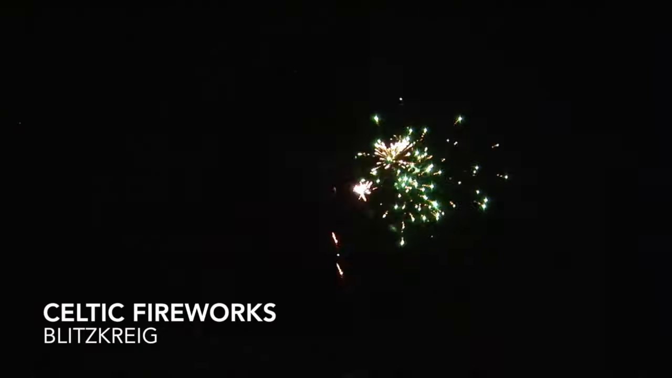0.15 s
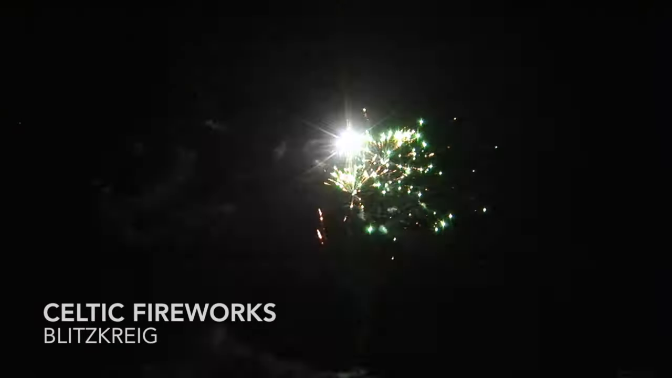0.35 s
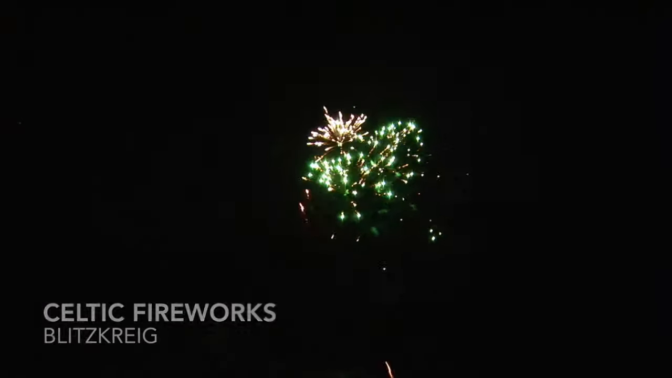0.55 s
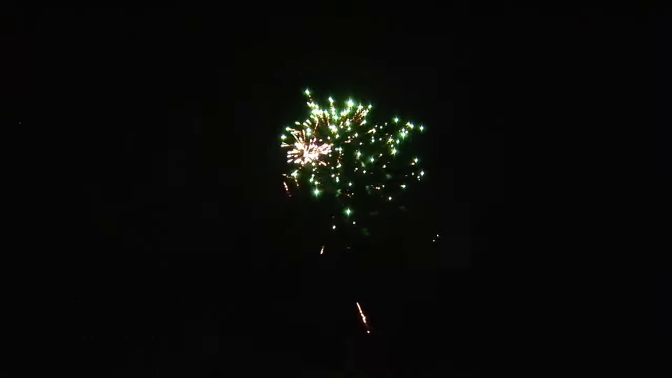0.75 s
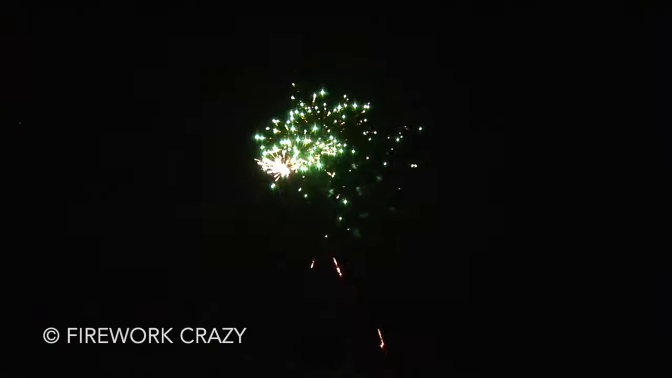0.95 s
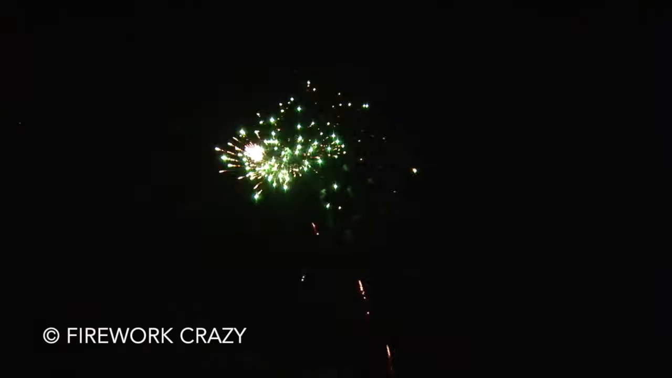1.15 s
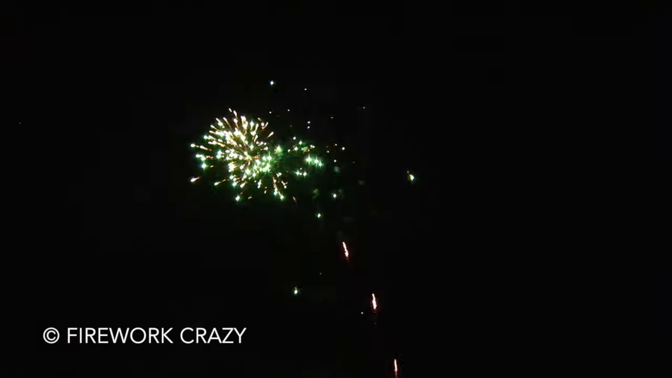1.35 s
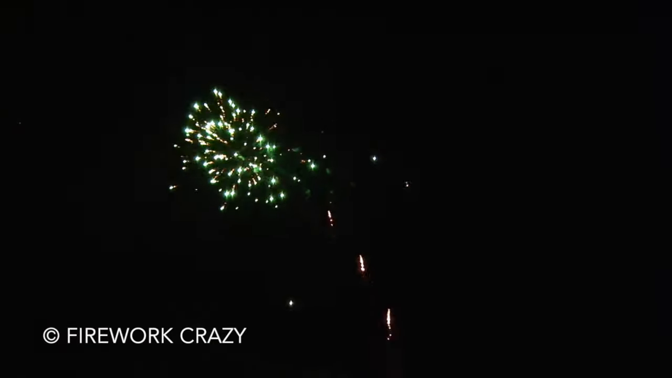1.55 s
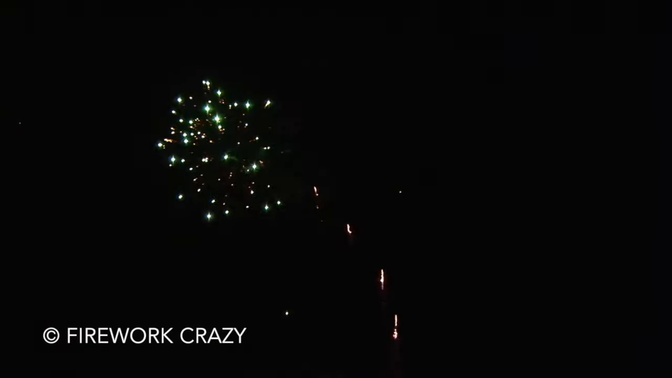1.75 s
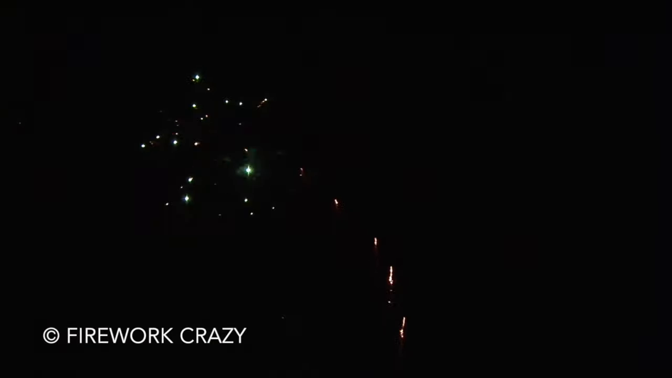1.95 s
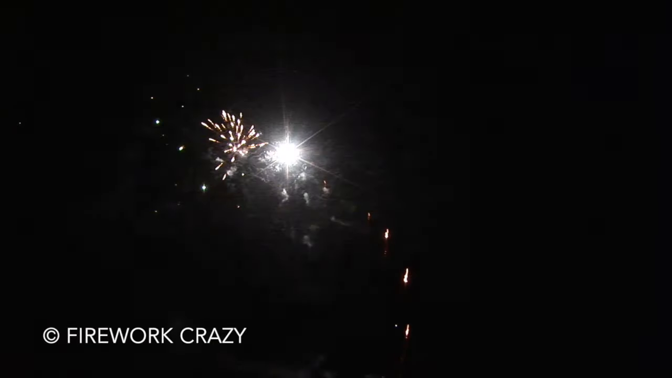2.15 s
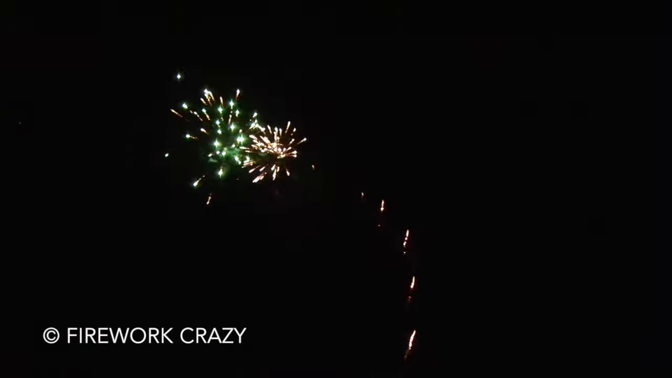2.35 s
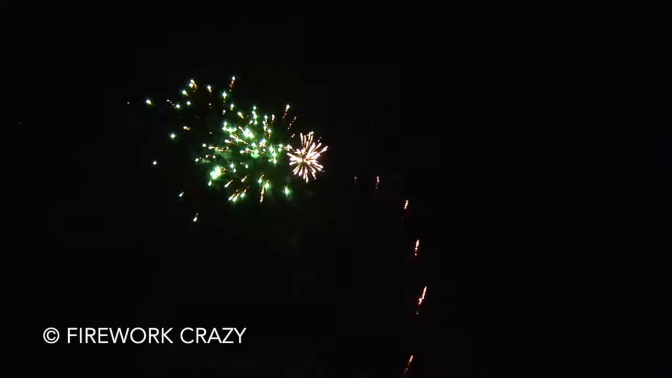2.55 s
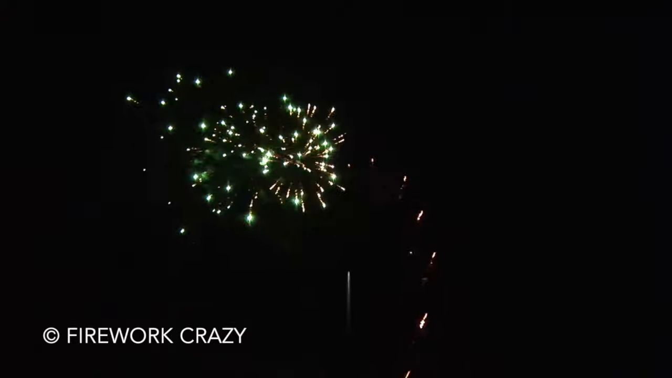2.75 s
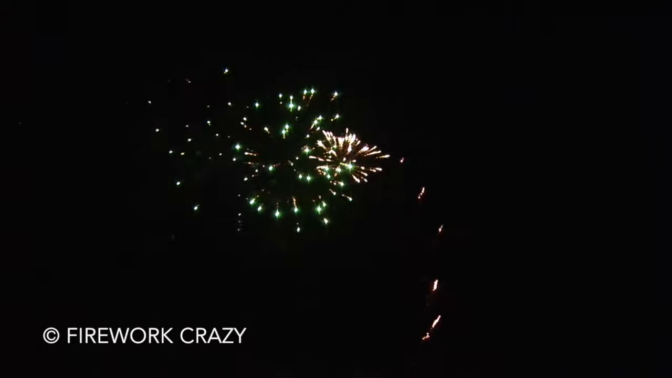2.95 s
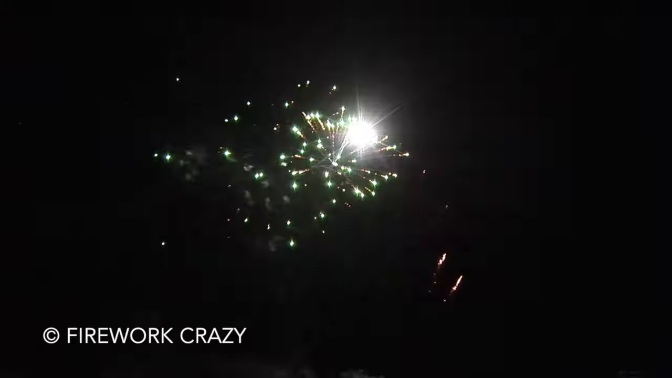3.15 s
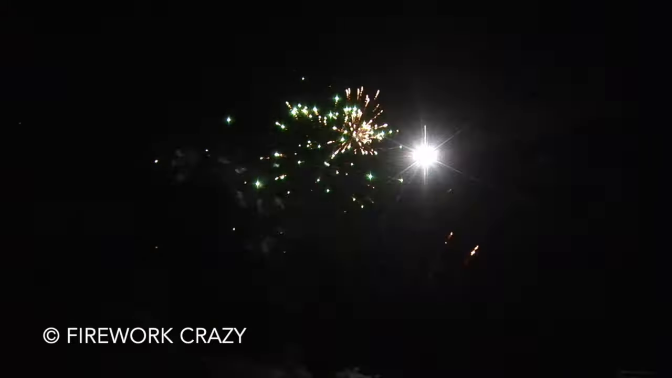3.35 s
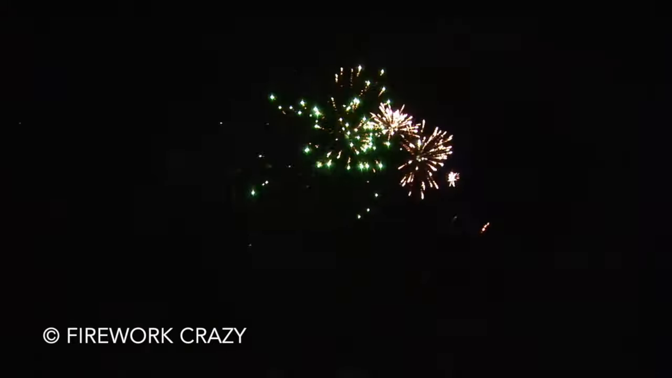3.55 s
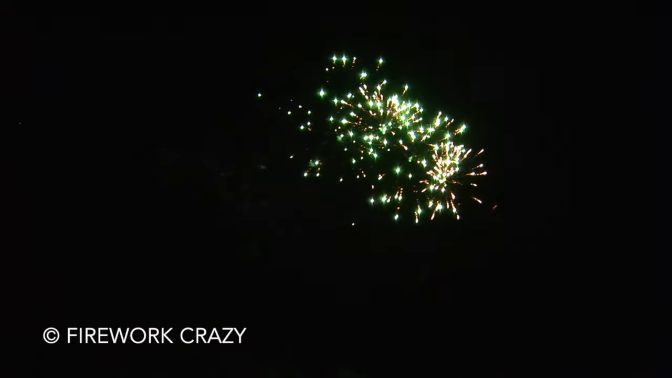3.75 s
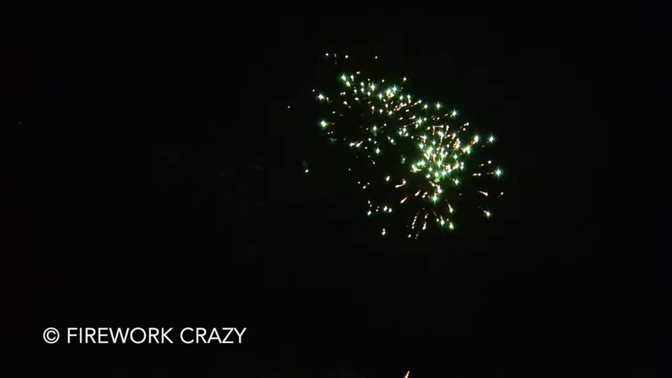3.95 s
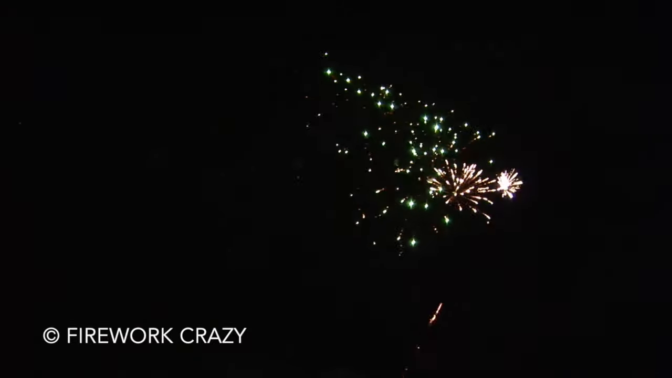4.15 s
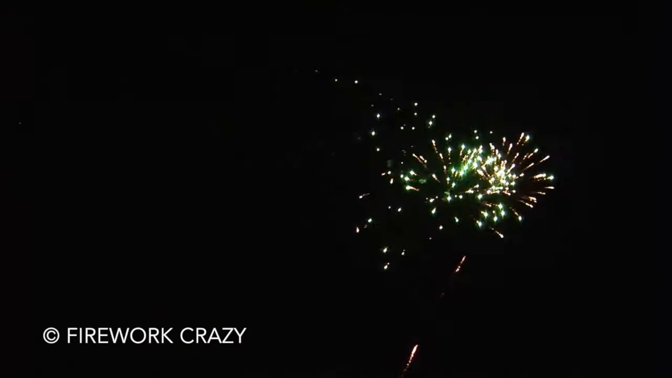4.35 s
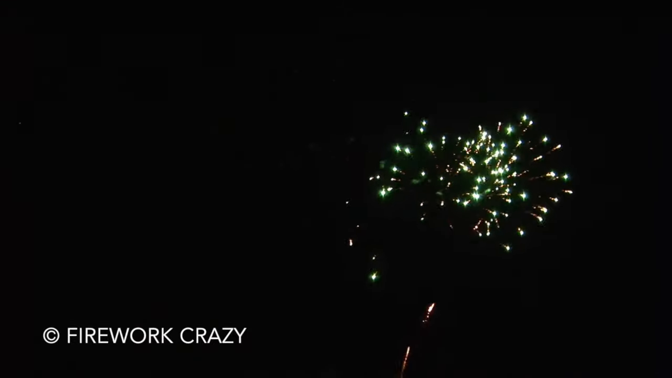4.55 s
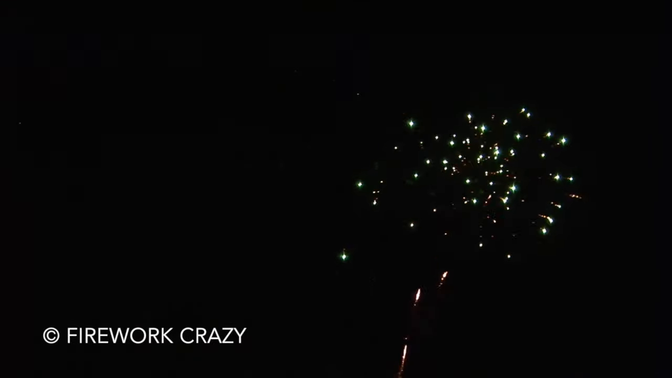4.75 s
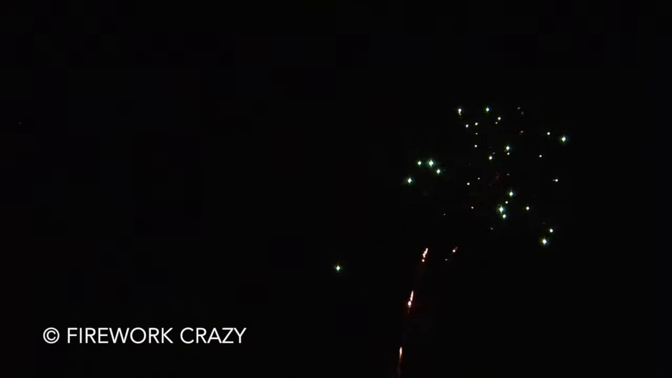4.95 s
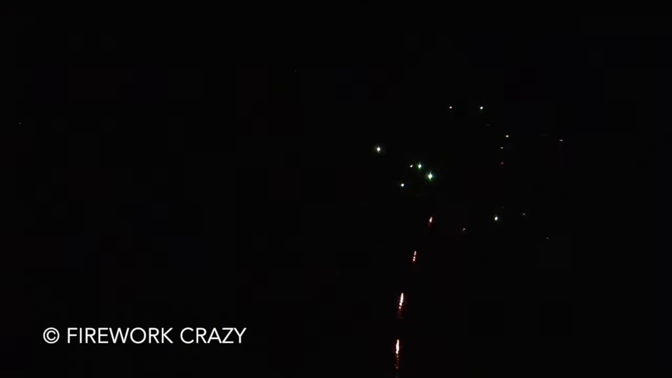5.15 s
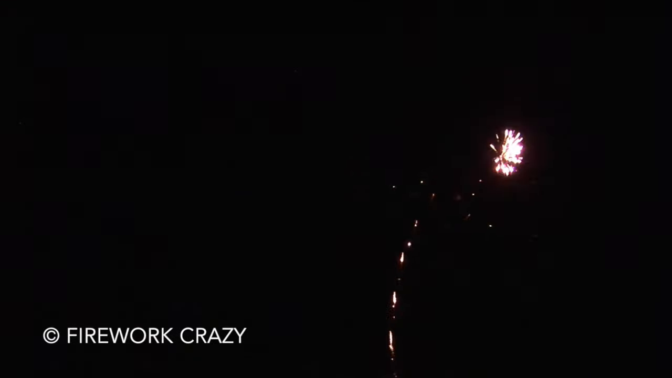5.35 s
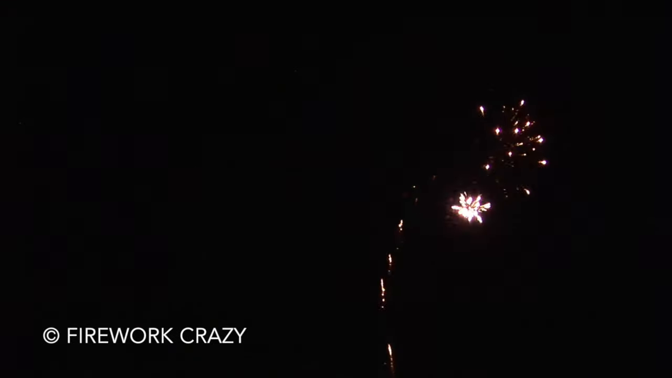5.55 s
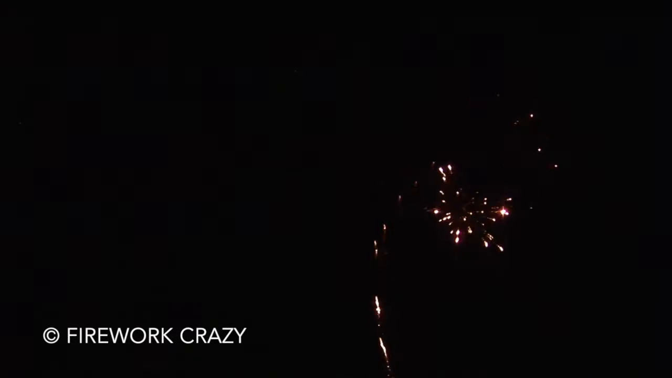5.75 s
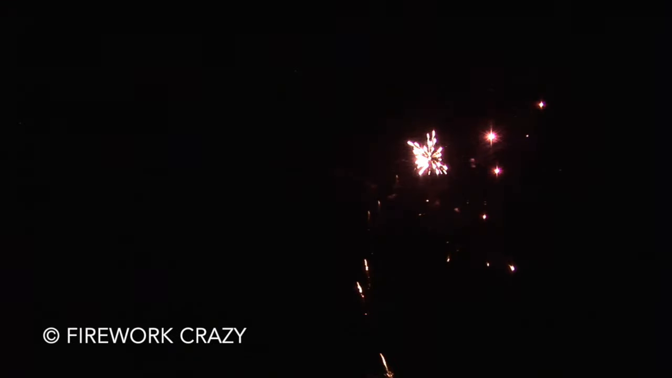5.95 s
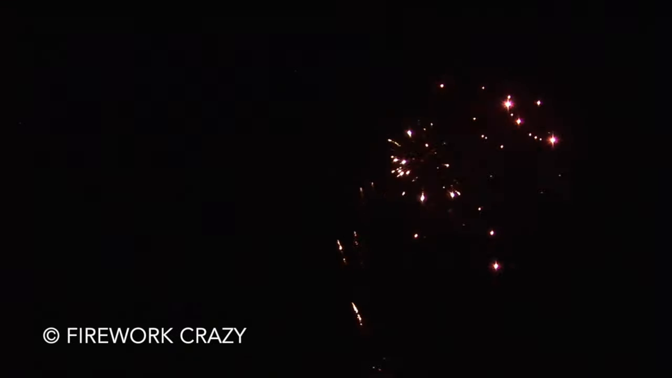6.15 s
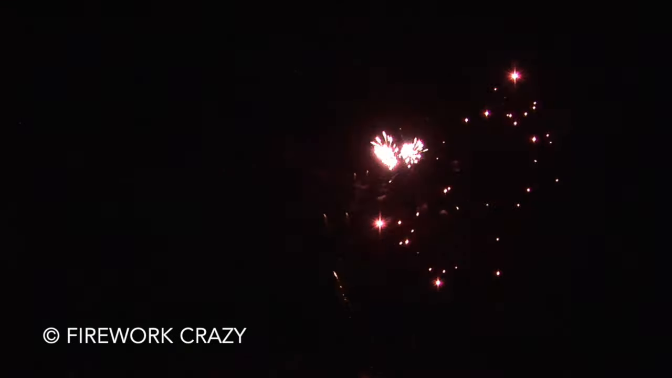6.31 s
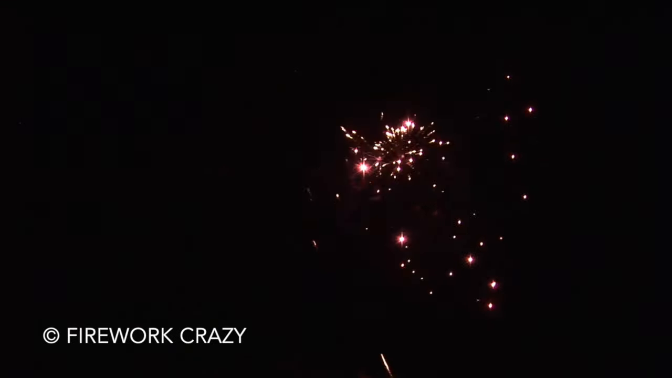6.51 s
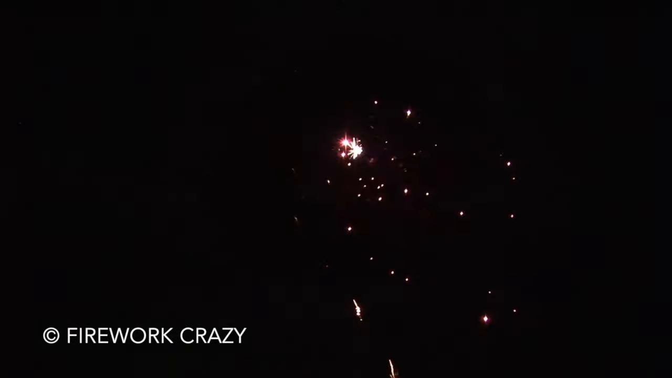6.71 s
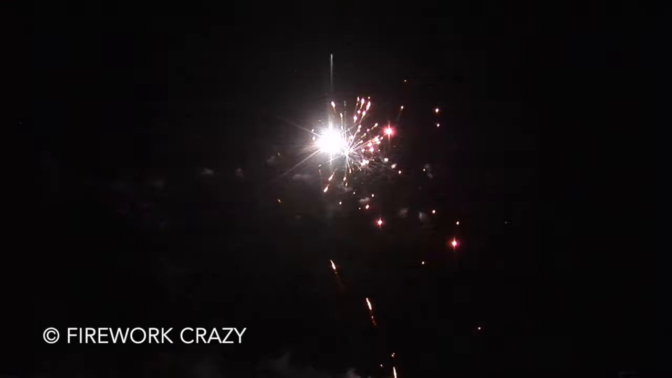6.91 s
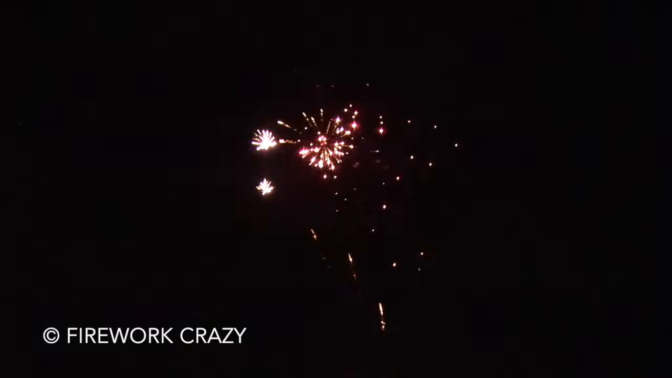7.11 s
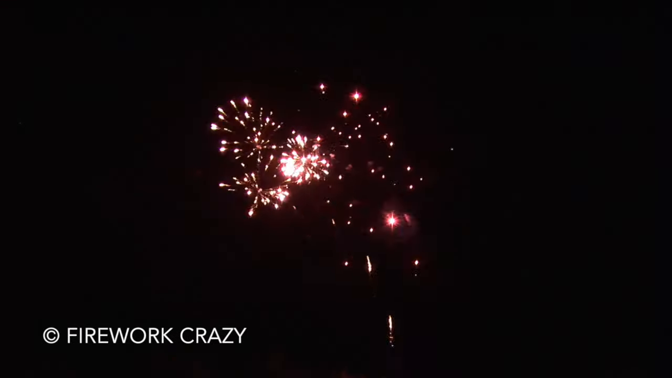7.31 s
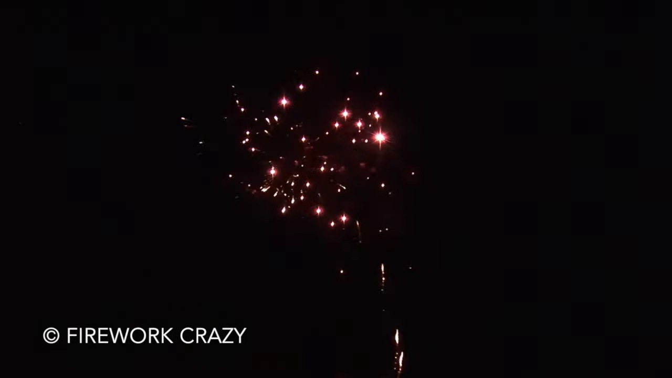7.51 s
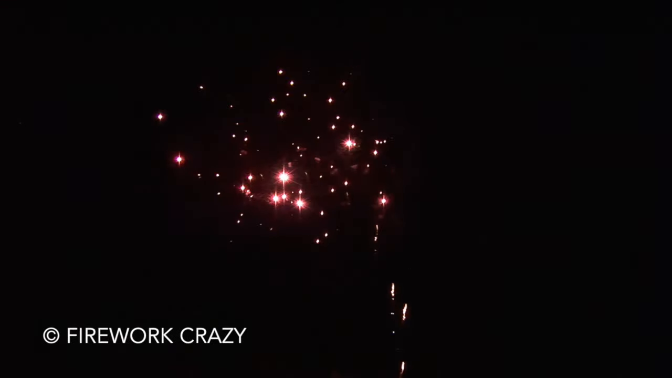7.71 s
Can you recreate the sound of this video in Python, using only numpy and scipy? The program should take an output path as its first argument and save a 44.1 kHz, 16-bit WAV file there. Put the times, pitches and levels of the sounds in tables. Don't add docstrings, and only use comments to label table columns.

```python
import sys
import numpy as np
from scipy import signal
from scipy.fft import rfft, irfft, next_fast_len
from scipy.io import wavfile
from scipy.ndimage import uniform_filter1d, map_coordinates

SR = 44100
rng = np.random.default_rng(int(sys.argv[2]) if len(sys.argv) > 2 else 0)


def output_pcm(signal):
    pcm = np.clip(np.atleast_2d(signal).T, -1, 1) * 32767
    wavfile.write(sys.argv[1], SR, np.round(pcm).astype(np.int16))


def boost(x):
    u = np.asarray(x, float) / 20
    return 10 ** u


N = 347508

# (time [s], ground echo delay [ms], blast level [dB], housing ring strength [ratio])
BURSTS = [(0.1231, 2.7, 8, 1.6), (0.4205, 3.21, 7.5, 3.6), (0.519, 2.54, 6.5, 2.6), (0.762, 3.43, 7.5, 3.4),
          (1.0195, 3.3, 7, 4.9), (1.2608, 3, 7.5, 4.5), (1.5255, 3.1, 8, 4.3), (2.394, 3.27, 7, 0.79),
          (2.57919, 3.32, 7.5, 4.1), (2.8774, 3.23, 7, 6.5), (3.1789, 3.18, 8, 4.9),
          (3.57, 3.47, 7.5, 1.66), (3.78339, 3.14, 7.5, 3.3), (3.8524, 3.42, 6.5, 1.4),
          (3.9499, 2.82, 6.5, 2.4), (4.4069, 2.53, 8, 1.6), (4.5326, 2.75, 6.5, 2),
          (5.7017, 3.16, 7.5, 3.3), (5.9042, 2.42, 7.5, 4.2), (6.2828, 3.17, 7.5, 3.4),
          (6.6486, 3.08, 7, 3.2), (6.677, 3.2, 5, 0.93), (7.1015, 3.06, 7, 2.5), (7.3452, 3.2, 7, 1.6),
          (7.4849, 3.3, 6.5, 0.73), (7.4887, 2.83, 6.5, 2.4), (7.615, 2.99, 6.5, 1.4)]
# (time [s], ground echo delay [ms], blast level [dB])
EARLIER_BURSTS = [
    (-.5, 3, 12),
    (-.2, 3, 9),
]
# (time [s], housing ring [Hz], blast level [dB], ring strength [ratio])
LIFTS = [(0.09049, 2100, -4, 3.6), (0.88751, 3010, -8.5, 19), (1.17696, 2970, -6.5, 9.7),
         (1.4287, 2650, -7, 10.2), (1.6659, 2440, -8.5, 9.6), (1.93434, 2530, -7.5, 6.4),
         (2.14858, 2480, -7, 5.4), (2.36361, 2550, -7.5, 9.4), (2.56389, 2530, -7, 8.1),
         (2.83459, 2000, -9, 3.4), (3.10339, 2600, -6, 7.4), (4.32101, 2350, -5.5, 4),
         (4.59852, 2300, -20, 5.5), (4.84718, 2010, -7, 1.4), (5.03989, 3030, -8.5, 10),
         (5.155, 620, -22, 1), (5.23558, 2730, -10.5, 15), (5.40291, 2690, -11, 11.7),
         (5.59784, 2300, -7, 1.8), (5.81902, 3100, -14.5, 3.4), (6.02006, 2200, -10.5, 3.8),
         (6.26036, 2840, -5.5, 1.3), (6.82038, 3060, -10.5, 10.3), (7.04895, 2560, -6, 4.8),
         (7.26889, 2480, -6.5, 5.9), (7.73184, 2780, -14, 17), (7.80101, 2710, -12.5, 11.4)]
# (frequency [Hz], width [Hz], strength [ratio])
LIFT_RING = (4720, 310, 5)
# (frequency [Hz], level [dB per Hz])
NEAR_SCATTER = [(150, -12), (400, 14.5), (1200, 0.5), (2400, 2), (4000, 2), (5500, -10), (7000, -60),
                (10000, -29.5), (15000, -22)]
# (frequency [Hz], level [dB per Hz])
TREE_SCATTER = [(200, -12), (600, -0.5), (2500, -5), (4000, -7), (5900, -16), (6600, -36), (8500, -24.5),
                (10000, -25), (13000, -21), (14900, -25), (15600, -53)]
# (frequency [Hz], T60 [s])
TREE_T60 = [(300, 0.94), (2000, 1.05), (5000, 1.19), (10000, 0.68), (15000, 0.33)]
# (frequency [Hz], width [Hz], strength [ratio])
HOUSING_MODES = [(2970, 470, 2.1), (1050, 500, .4), (3800, 600, -1.2), (4400, 900, -1.5), (5000, 500, .8),
                 (10500, 3000, 1.5), (12800, 3000, -7)]
# (frequency [Hz], width [Hz], level [dB])
PORT_DIFFERENCE = [(895, 1100, -21), (4140, 510, -9), (5800, 340, 9), (11900, 6200, -8.5)]
# (frequency [Hz], level [dB])
PORT_COLOUR = [(200, -1.1), (1900, 2), (2350, 1.5), (2700, -1), (3500, -5.5), (4350, -5.5), (4900, 1),
               (5350, -8.5), (5800, 7), (6300, 2)]
# (frequency [Hz], correlation, limited to -1..1 after interpolation)
PORT_LIKENESS = [(60, 0.22), (400, 0.24), (800, 0.31), (1400, 0.54), (2800, 0.99), (4000, 0.36),
                 (5300, -0.31), (6000, -0.95), (6500, -1.5), (8700, -0.66), (9500, -0.16), (10000, 0.8),
                 (10800, 0.91), (11600, 0.29)]
# (delay [ms], share [ratio])
CLOSE_BOUNCES = [(.66, -0.053), (.88, 0.17), (1.182, -0.12), (1.34, 0.16), (1.81, 0.13), (2.54, 0.13)]
# (time [s], level [dB])
EMBER_TICKS = [
    (1.4308, -22),
    (1.4725, -34),
]
# (time [s], half length [s], level [dB], frequency [Hz])
CHIRPS = [
    (4.15, 0.033, -43, 2350),
    (4.62, .03, -44, 2360),
    (5.103, .04, -51, 2340),
    (6.102, .035, -44.5, 2330),
    (7.2, .03, -46.5, 3200),
]
# (frequency [Hz], level [dB per Hz])
FAR_ROLL = [(150, 2), (300, 4), (700, -3), (1500, -3), (2500, -9.5), (3500, -10), (5500, -25.5),
            (6200, -33), (6800, -40), (14000, -53), (15000, -72)]
# (time [s], level [dB])
WIND = [(0.0, -48), (0.66, -44.5), (0.81, -41), (1.23, -44), (2.22, -40.5), (2.52, -44.5), (3.07, -45),
        (3.6, -36), (3.8, -40), (3.99, -39.5), (4.17, -35.5), (5.51, -36), (5.79, -42), (6.28, -37.5),
        (6.85, -39), (6.96, -35.5), (7.53, -42), (7.88, -33)]
# (frequency [Hz], level [dB per Hz])
BUFFET = [(20, -20), (50, -2.5), (80, -0.4), (120, -2), (170, -7), (230, -12), (350, -20.5), (700, -30),
          (2000, -95)]
# (frequency [Hz], level [dB per Hz])
HISS = [(200, -6), (6000, -13), (7000, 3), (14100, -0.5), (14600, -44)]

RESPONSE_SIZE = 4096
RING_HZ = 2306


def along(points, hz):
    point_hz, value = np.transpose(points)
    return np.interp(np.log(hz + 1), np.log(point_hz + 1), value)


def mode(f, hz, width):
    return 1j * f * width / (hz * hz - f * f + 1j * f * width)


def delayed(f, seconds):
    return np.exp(-2j * np.pi * f * seconds)


def wobble(rate):
    knots = rng.standard_normal(int(N * rate / SR) + 4)
    return map_coordinates(knots, [np.arange(N) * rate / SR])


def bounces(f, strength):
    vary = 1 + 0.5 * rng.standard_normal(len(CLOSE_BOUNCES))
    reflected = sum(v * share * delayed(f, ms / 1000) for (ms, share), v in zip(CLOSE_BOUNCES, vary))
    return 1 + strength * reflected


def blasts(events, path):
    out = np.zeros((2, N + RESPONSE_SIZE))
    f = np.fft.rfftfreq(RESPONSE_SIZE, 1 / SR)
    body = 1 + sum(strength * mode(f, hz, width) for hz, width, strength in HOUSING_MODES)
    low_cut = -f * f / (245 ** 2 - f * f + 1j * f * 350)
    lucks = rng.standard_normal((len(events), len(PORT_DIFFERENCE)))
    for (s, own, db, ring), luck in zip(events, lucks):
        ms, ring_hz, way = path(f, own, db, ring)
        sag = 2j * np.pi * f * ms / 1000
        jump = SR * ms / 1000 * sag / (1 + sag) ** 2
        late = delayed(f, (s * SR % 1) / SR)
        mid = boost(db) * jump * way * (body + ring * mode(f, ring_hz, 606)) * low_cut * late
        difference = 0
        for k, (hz, width, level_db) in enumerate(PORT_DIFFERENCE):
            gain = boost(level_db + 3.9 * np.clip(luck[k], -1.2, 1.2))
            difference = difference + (-1) ** k * gain * mode(f, hz, width)
        side = mid * difference
        out[:, int(s * SR):][:, :RESPONSE_SIZE] += irfft([mid + side, mid - side], RESPONSE_SIZE)
    return out[:, :N]


def dying(events, t60, rise):
    def power(hz, s):
        total = 0
        for t, _, db, *_ in events:
            age = np.maximum(s - t - .0025, 0)
            total = total + boost(2 * db - 120 * age / t60(hz)) * (1 - np.exp(-(age / rise) ** 2))
        return total
    return power


def wash(spectrum, power, alike=PORT_LIKENESS):
    hz, s, (a, b) = signal.stft(rng.standard_normal((2, N)), SR, nperseg=256)
    turn = np.arccos(np.clip(along(alike, hz), -1, 1))[:, None] / 2
    patches = uniform_filter1d(rng.standard_normal(a.shape), size=3, axis=0)
    patches = uniform_filter1d(patches, size=16, axis=1)
    colour_db = along(spectrum, hz) + along(PORT_COLOUR, hz)
    gain = boost(colour_db[:, None] + 1.6 * patches / patches.std()) * np.sqrt(power(hz[:, None], s))
    shared, opposed = a * np.cos(turn) * gain, b * np.sin(turn) * gain
    return signal.istft(np.array([shared + opposed, shared - opposed]), SR, nperseg=256)[1][:, :N]


def shells():
    def path(f, ground_ms, db, ring):
        ms = max(1.43 + 0.88 * (db - 7.5), .3)
        ring_hz = RING_HZ + 120 * (ring - 3)
        ground = 0.62 * delayed(f, ground_ms / 1000) * (1 + 1j * f / 14000) / (1 + 1j * f / 2200)
        return ms, ring_hz, bounces(f, strength=0.12) * (1 + ground) / (1 + 1j * f / 4800) ** 2

    def near_t60(hz):
        return along([(300, 0.072), (3000, 0.066), (8000, 0.075)], hz)

    near = boost(-21) * wash(NEAR_SCATTER, dying(BURSTS, near_t60, rise=0.00053))
    trees = boost(-31.5) * wash(TREE_SCATTER, dying(BURSTS, lambda hz: along(TREE_T60, hz), rise=0.0097))
    return blasts(BURSTS, path), near + trees


def tubes():
    bright_hz, bright_width, bright_strength = LIFT_RING

    def path(f, ring_hz, db, ring):
        edge_hz = 4270 + 70 * (db + 5.5) + 0.59 * (ring_hz - RING_HZ)
        rounding = (1 + 1j * f / edge_hz / 0.39 - (f / edge_hz) ** 2) ** 2
        rounding = rounding * (1 + 1j * f / 7000 - (f / 5500) ** 2)
        tube = 1 + 1.9 * mode(f, 323.5, 42) - bright_strength * mode(f, bright_hz, bright_width)
        lift_ms = 2.2
        return lift_ms, ring_hz, bounces(f, strength=1.0) * tube / rounding

    dull = [(hz, db - 25 * (hz / 9000) ** 2) for hz, db in NEAR_SCATTER]
    near = boost(-18.5) * wash(dull, dying(LIFTS, lambda hz: .07, rise=0.00024))
    return blasts(LIFTS, path), near


def embers():
    t, ring_hz, t60 = np.arange(N) / SR, 14500, 0.0024
    out = np.zeros(N)
    for s, db in EMBER_TICKS:
        age = np.maximum(t - s, 0)
        out += boost(db - 60 * age / t60) * np.sin(2 * np.pi * ring_hz * age)
    return out


def far_roll():
    echoes = dying(EARLIER_BURSTS + BURSTS, lambda hz: 3, rise=0.017)
    roll = wash(FAR_ROLL, lambda hz, t: boost(2 * 2.5) + echoes(hz, t))
    return roll / roll.std() * boost(-40 + 1.8 * wobble(14))


def wind():
    s, wind_db = np.transpose(WIND)
    m = next_fast_len(N)
    colour = boost(along(BUFFET, np.fft.rfftfreq(m, 1 / SR)))
    gusts = irfft(rfft(rng.standard_normal((2, m))) * colour, m)[:, :N]
    gusts = gusts + 0.053 * gusts[::-1]
    level_db = np.interp(np.arange(N) / SR, s, wind_db) + 6.5
    lumps_db = 1.56 * wobble(19) + 0.83 * np.array([wobble(20), wobble(9.8)])
    return gusts / gusts.std() * boost(level_db + lumps_db)


def insects():
    t, a, b = np.arange(N) / SR, wobble(260), wobble(260)
    out = np.zeros(N)
    for s, half, db, hz in CHIRPS:
        swell = boost(db) * np.exp(-((t - s) / half) ** 4)
        out += swell * (a * np.sin(2 * np.pi * hz * t) + b * np.cos(2 * np.pi * hz * t))
    return out


def preamp():
    return boost(-73.5) * wash(HISS, lambda hz, t: 1 + 0 * t, alike=[(60, 0), (16000, 0)])


def ducking(depth_db, recover):
    t = np.arange(N) / SR
    dips = [np.where(t > s + .008, np.exp(-np.abs(t - s) / recover), 0) for s, *_ in BURSTS]
    return boost(-depth_db * uniform_filter1d(np.max(dips, 0), size=200))


def scene():
    burst, burst_echo = shells()
    lift, lift_echo = tubes()
    bed = burst_echo + lift_echo + far_roll() + wind() + insects()
    return burst + lift + ducking(depth_db=10.5, recover=0.097) * bed + embers() + preamp()


def top_cut(x):
    return signal.sosfilt(signal.butter(12, 16050, fs=SR, output="sos"), x)


def record(dry):
    top = signal.butter(8, 16000, fs=SR, output="sos")
    bottom = signal.butter(1, 22, "high", fs=SR, output="sos")
    clipped = np.clip(dry, -1.04, 1.04)
    limited = signal.sosfiltfilt(top, signal.sosfilt(bottom, clipped))
    mix = np.clip(limited, -1, 1)
    return top_cut(mix)


dry = scene()
out = record(dry)
output_pcm(out)
```